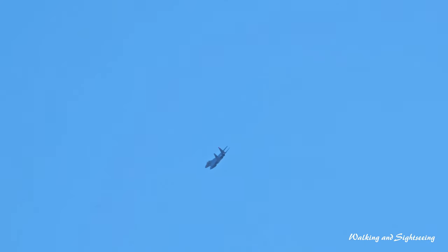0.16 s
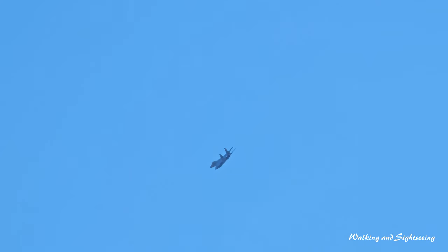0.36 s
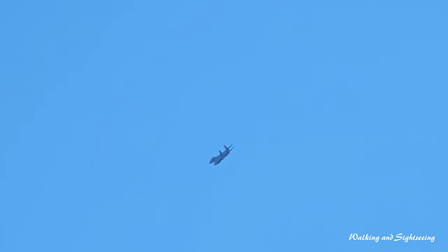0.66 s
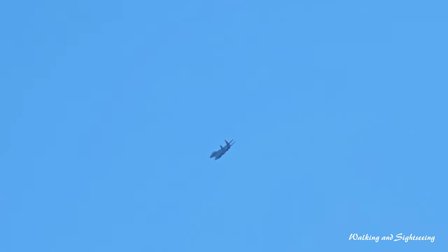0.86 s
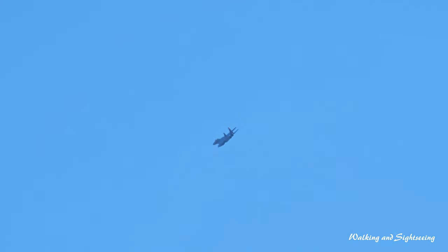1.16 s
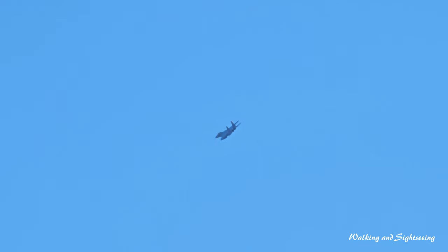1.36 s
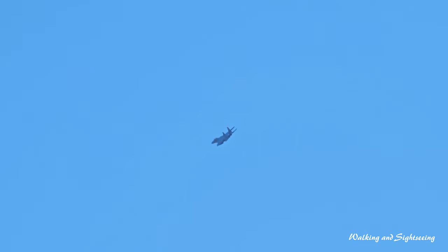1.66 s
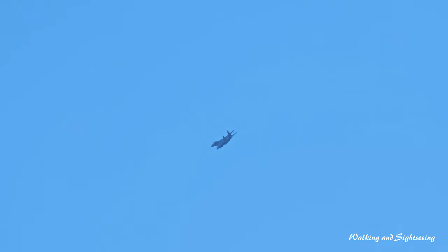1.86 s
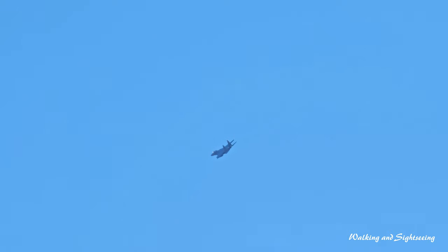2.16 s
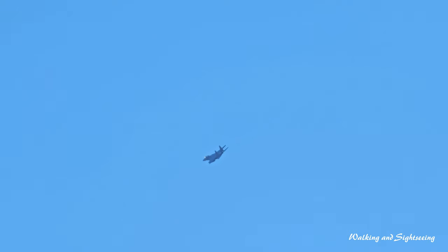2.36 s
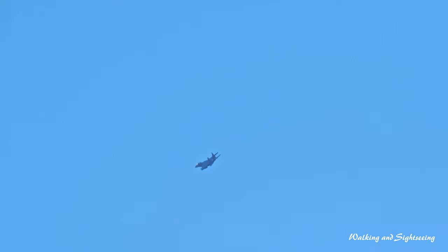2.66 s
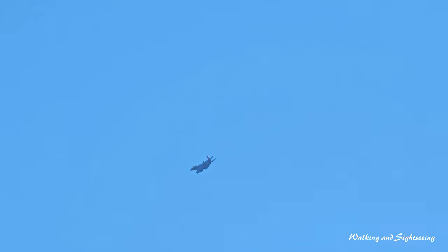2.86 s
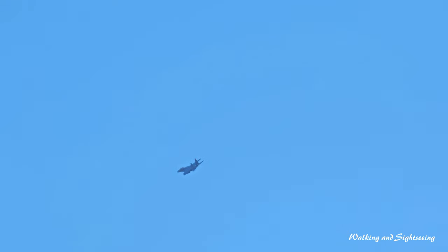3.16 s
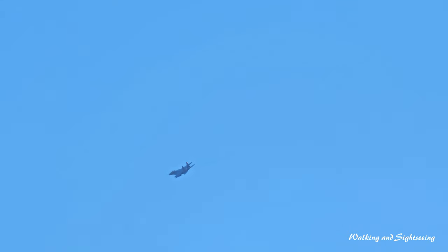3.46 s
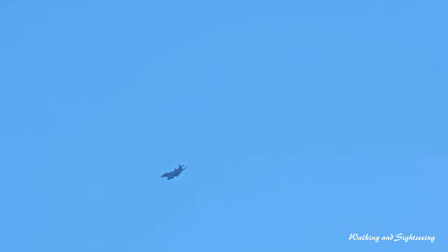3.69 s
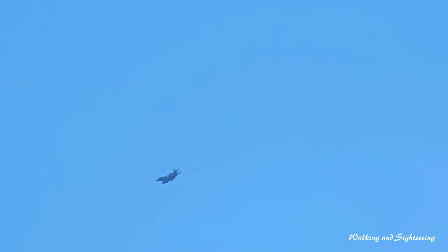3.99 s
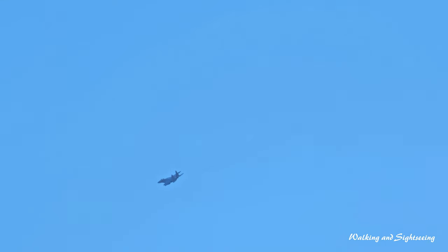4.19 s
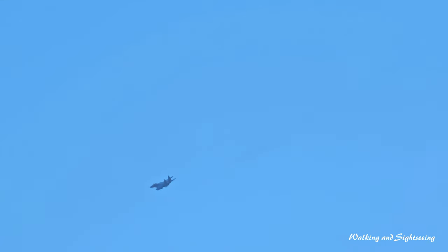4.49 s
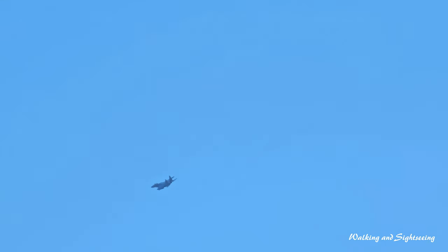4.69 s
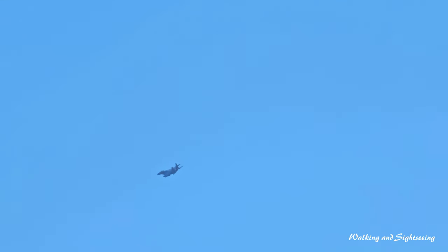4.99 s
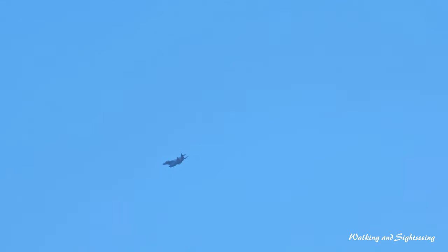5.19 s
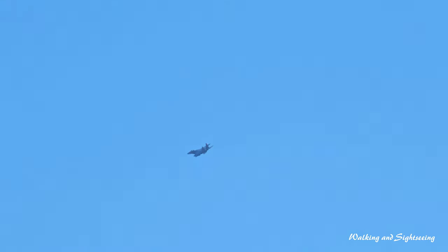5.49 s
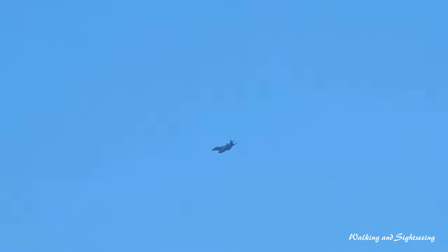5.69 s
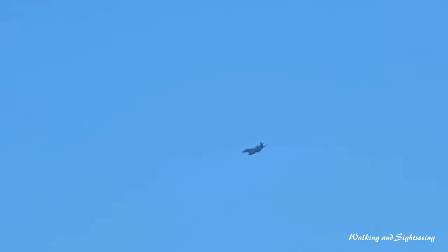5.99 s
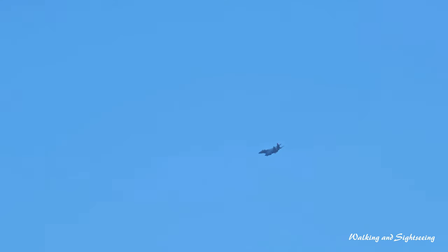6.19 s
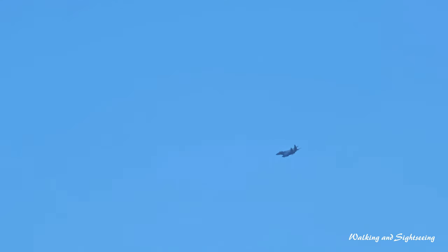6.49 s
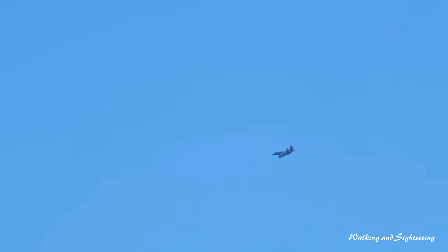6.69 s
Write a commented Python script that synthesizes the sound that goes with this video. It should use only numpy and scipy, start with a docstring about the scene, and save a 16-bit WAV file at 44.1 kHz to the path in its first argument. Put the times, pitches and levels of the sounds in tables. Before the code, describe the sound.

A distant fighter jet turns in open sky, heard outdoors from the ground in wide stereo. From 0 to 2 s there is a dark, mid-low roar over deep rumble, fluttering and gusty, with a thin central fizz fading away and a few soft crackles near 0.8 and 1.3 s. A low thud swells around 1.8 s. From 2 to 4 s the exhaust comes round: the tone drops, the roar turns rougher, with a heavy thump near 3.4 s and scattered crackles, notably around 2.9 and 3.9 s. From 4.5 to 5.5 s it is loudest, with dense volleys of dull and snappy shocks tearing through heavy bass thuds. Crackling continues in looser bursts, surging near 6.1 s, then thins toward 6.85 s while the roar persists, somewhat lighter. Brief lulls break the turbulence; short scattered reflections and a faint steady hiss lie underneath.

```python
"""A distant fighter jet, made from shaped noise and pressure pulses, turns its exhaust towards the listener.
Large eddies rumble, smaller ones roar and rasp, and the finest fizz at first; the biggest pass as low thuds.
As the exhaust comes round, a crackle of small shocks grows; strong shocks come in volleys, dull to snappy.
The air takes off treble, the ground cancels a band, and random echoes scatter the shocks to both sides.
A faint, steady hiss lies underneath."""
import sys
import numpy as np
from scipy import signal
from scipy.fft import rfft, irfft, next_fast_len
from scipy.io import wavfile
from scipy.ndimage import uniform_filter1d, minimum_filter1d, map_coordinates

SR = 44100
rng = np.random.default_rng(int(sys.argv[2]) if len(sys.argv) > 2 else 0)


def unload_audio(sound):
    """Save the sound as a 16-bit wav file, at the path given as the first command line argument."""
    columns = np.transpose(np.atleast_2d(sound))
    # keep every value between -1 and 1, then stretch to whole-number steps
    steps = np.round(np.clip(columns, -1, 1) * 32767)
    wavfile.write(sys.argv[1], SR, steps.astype(np.int16))


N = 301990

# How squarely the exhaust faces the listener: [t/s, facing 0-1]
FACING = [(0, 0.06), (1.3, 0.13), (2.1, 0.35), (4.3, 0.93), (4.7, 0.8), (6.85, 0.4)]
# Base levels of the rumble, the roar, and the treble that gets through the air: [t/s, level/dB]
BASS_LEVEL = [(0.0, -25), (1.62, -27), (1.85, -22.5), (2.25, -28.5), (2.85, -26.5), (3.32, -25.5),
              (3.81, -32), (4.5, -24.5), (4.92, -19), (5.15, -19), (6.85, -22.5)]
ROAR_LEVEL = [(0.0, -23), (0.55, -25), (0.77, -24), (0.95, -23), (1.53, -24.5), (2.1, -20), (2.45, -23),
              (2.7, -24.5), (3.0, -23), (3.35, -19.5), (3.58, -25), (4.0, -19.5), (4.6, -21), (4.75, -20),
              (5.07, -16.5), (5.28, -18.5), (5.55, -19), (5.8, -19.5), (6.281, -18), (6.58, -22.5),
              (6.85, -20)]
TREBLE_LEVEL = [(0.0, -36.5), (0.5, -42.5), (1.22, -36.5), (1.6, -38.5), (1.75, -42), (2.13, -45.5),
                (2.38, -45.5), (3.34, -43), (4.1, -43), (4.5, -42), (4.85, -38.5), (5.02, -40.5),
                (5.23, -39.5), (5.36, -40.5), (5.6, -39), (5.85, -38), (5.95, -39.5), (6.1, -43),
                (6.35, -43.5), (6.85, -41.5)]
# Tone of the large eddies' rumble: [f/Hz, relative level/dB per Hz]
RUMBLE_SPECTRUM = [(12, -29), (25, -14), (42, -4.5), (70, -1.5), (100, -3), (135, -12), (175, -17),
                   (600, -83.5)]
# Tone of the roar side-on, exhaust turned round, and drawing away: [f/Hz, relative level/dB per Hz]
ROAR_SIDE_SPECTRUM = [(60, -28), (125, -6.5), (165, -7), (210, -1.5), (260, -2.5), (310, -3.5), (390, -0.5),
                      (445, -9), (540, -6.5), (680, -13.5), (1000, -22), (1500, -29), (3000, -86)]
ROAR_FACING_SPECTRUM = [(60, -20), (115, 1), (145, 1), (190, 0), (240, -1), (340, -0.5), (420, -5),
                        (520, -9), (620, -12.5), (830, -22), (1000, -25.5), (1500, -42.5), (3000, -71.5)]
ROAR_AWAY_SPECTRUM = [(60, -29.5), (110, -14), (160, 2.5), (250, 2.5), (350, -3.5), (500, -6.5), (610, -14),
                      (740, -19.5), (850, -28.5), (1500, -39), (3000, -71)]
# Tone of the rasp and of the finest eddies' fizz: [f/Hz, relative level/dB per Hz]
RASP_SPECTRUM = [(400, -16.5), (640, -0.5), (860, -5), (1050, -3.5), (1300, -2), (1470, -4), (1560, -5.5),
                 (1750, -12), (2100, -14), (2600, -30), (3500, -38), (6000, -57.5)]
FIZZ_SPECTRUM = [(1200, -10), (1900, 6), (2800, -7), (3700, -14.5), (5000, -41)]
# Tone of the steady hiss: [f/Hz, relative level/dB per Hz]
HISS_SPECTRUM = [(300, -2.5), (2500, 12.5), (3600, 11.5), (4300, 7), (4900, 10.5), (5500, 6.5), (6000, -3),
                 (7300, 4.5), (9000, 1), (13500, 2.5), (15700, 2)]
# Tone of a shock's crack, its dull body and its snap: [f/Hz, relative level/dB per Hz]
CRACK_SPECTRUM = [(30, -27.5), (110, -3), (190, 6), (450, -1.5), (660, 3.5), (830, 3.5), (990, -1),
                  (1330, -6.5), (1520, -16), (2100, -29), (2700, -37.5), (3600, -45), (8000, -83)]
BODY_SPECTRUM = [(30, -19), (120, -8), (240, 4.5), (340, -2.5), (530, 2.5), (700, -0.5), (860, -2.5),
                 (1020, -15.5), (1400, -36), (3000, -73.5)]
SNAP_SPECTRUM = [(300, -30), (1500, -3.5), (2200, 10), (2700, 1.5), (3400, -4), (4200, -15), (6500, -28.5),
                 (10000, -49)]
# The band that the ground reflection cancels: [t/s, f/Hz, depth/dB]
GROUND_NOTCH = [(0, 287, -5.5), (1.2, 326, -4.5), (1.6, 340, -10), (2.4, 355, -6.5), (3.5, 319, -3.5),
                (5.3, 330, -3.5), (6.85, 352, -1.5)]
# How long the reflections take to die by 60 dB: [f/Hz, decay/s]
ECHO_DECAY = [(100, 0.16), (700, 0.12), (4000, 0.038)]
# Brief closings of the stereo image: [middle t/s, half-length/s, side level/dB]
NARROWINGS_LIST = [(0.04, 0.066, -3), (0.205, 0.041, -8.5), (0.475, 0.11, -4.5), (0.995, 0.023, -13),
                   (1.2, 0.17, -2), (1.547, 0.082, -1.5), (1.931, 0.035, -4.5), (2.374, 0.13, -1.5),
                   (2.839, 0.027, -17), (3.02, 0.027, -10), (3.379, 0.12, -18.5), (3.515, 0.065, -7),
                   (4.057, 0.096, -3.5), (4.476, 0.031, -15), (5.116, 0.03, -13.5), (5.33, 0.048, -9.5),
                   (5.486, 0.079, -3.5), (5.653, 0.032, -12), (5.934, 0.022, -11.5), (6.009, 0.016, -14),
                   (6.49, 0.059, -10.5)]
# The largest eddies: [t/s, level/dB, f/Hz, lead of the left side/radians]
BIG_EDDIES = [(0.65, -13, 72.6, -2), (0.83, -15.5, 69.4, 1.5), (1.401, -14, 91, -1), (1.78, -7.5, 116, 1.4),
              (2.027, -11, 76, 2), (2.559, -13, 62, 1.5), (2.645, -9, 225, -3), (2.838, -19, 47, -0.5),
              (2.912, -10, 85, -1.3), (3.367, -3, 78, 2), (3.923, -8.5, 73, 1.3), (4.092, -5.5, 230, -1),
              (4.366, -9, 84, 2.5), (4.424, -8.5, 67, -2.5), (4.569, -9, 84, 0.6), (4.779, -5, 64, 0),
              (4.835, -6, 216, 2), (4.936, 1.5, 217, -1.8), (5, -19, 60.4, 5), (5.158, -9, 59, -4),
              (5.189, -10.5, 49.4, -0.3), (5.286, -2.5, 166, 2.5), (5.289, -2.5, 76, -2),
              (5.305, -6.5, 174, 1), (5.435, -7, 182, 0), (5.44, -6.5, 57, 2), (5.477, -5.5, 163, 1),
              (5.774, -9, 95, -4.5), (5.895, -8.5, 140, 1), (6.054, -10, 71, -2.4), (6.112, -2, 59.2, 2),
              (6.251, -10, 70, 0.2), (6.39, -3.5, 181, 1), (6.427, -4, 50, -1.8), (6.565, -10.5, 71, 1.7),
              (6.647, -5, 55.6, 0.3)]
# Volleys of shocks: [t/s, level of the crack/dB, steepness 0 dull to 1 sharp, spread/s]
SHOCK_VOLLEYS = [(0.818, -23.5, 0.48, .009), (1.075, -31.5, 0.13, 0.019), (1.319, -30, 0.55, .008),
                 (2.022, -32, 0.11, 0.013), (2.121, -30.5, 0.2, 0.008), (2.826, -24, 0.51, 0.0054),
                 (2.895, -27.5, 0.62, .008), (2.939, -27.5, 0.48, 0.006), (3.092, -25, .6, 0.0088),
                 (3.232, -38, 0.32, 0.0082), (3.715, -30, 0.53, .006), (3.859, -23.5, 0.74, .012),
                 (3.905, -24.5, 0.76, .018), (4.212, -29.5, .72, .005), (4.349, -28.5, .4, 0.003),
                 (4.369, -31, .62, .004), (4.423, -35, 0.37, 0.004), (4.554, -22, 0.44, 0.0067),
                 (4.611, -21, 0.42, 0.007), (4.645, -25, 0.44, .005), (4.676, -17, 0.87, .008),
                 (4.699, -15, 0.61, .005), (4.714, -27.5, 0.66, 0.0046), (4.749, -23, 0.67, 0.0034),
                 (4.783, -19.5, 0.46, 0.004), (4.802, -18, .4, 0.0057), (4.825, -21, 0.57, 0.0074),
                 (4.859, -19.5, 0.27, .007), (4.887, -21, 0.38, 0.0073), (4.91, -25, 0.31, 0.0027),
                 (4.933, -28.5, 0.064, 0.0073), (4.958, -13, .72, 0.003), (5.03, -24.5, 0.9, 0.002),
                 (5.036, -23.5, 0.32, .003), (5.048, -17.5, 0.72, 0.0013), (5.066, -22, 0.55, .004),
                 (5.149, -16, 0.19, 0.004), (5.175, -17.5, 0.82, 0.0032), (5.182, -15, 0.5, 0.0016),
                 (5.202, -16, 0.45, 0.0012), (5.219, -21.5, 0.5, 0.0037), (5.236, -25, 0.35, .01),
                 (5.287, -23, 0.11, 0.0059), (5.307, -22.5, 0.36, .004), (5.336, -28.5, .4, .002),
                 (5.377, -24.5, .9, .005), (5.399, -24.5, 0.61, 0.002), (5.435, -28.5, 0.34, .005),
                 (5.473, -12.5, 0.74, .004), (5.491, -26, .85, 0.002), (5.549, -26.5, .5, .004),
                 (5.583, -19.5, 0.83, .003), (5.691, -21.5, .9, .005), (5.761, -22, 0.81, .003),
                 (5.779, -20, 0.66, 0.0063), (5.833, -27.5, 0.44, 0.0056), (5.856, -27, 1, 0.0025),
                 (5.878, -23.5, 0.79, 0.0074), (5.797, -24, .9, .002), (5.984, -18.5, 0.5, 0.0059),
                 (6.008, -19.5, 0.44, 0.003), (6.02, -19, .55, 0.0024), (6.056, -20, 0.95, 0.008),
                 (6.083, -11.5, 0.59, .003), (6.101, -12.5, 0.51, .007), (6.126, -18.5, 0.37, .006),
                 (6.194, -29, 0.24, 0.012), (6.245, -27, .5, .004), (6.322, -27.5, 0.4, 0.0068),
                 (6.423, -26, 0.19, 0.007), (6.644, -22.5, 0.71, 0.015)]
# Thin single snaps: [t/s, level/dB]
LONE_SNAPS = [(0.89, -36)]
# Lulls in the turbulence: [middle t/s, half-length/s, level/dB]
LULL_TIMES = [(1.873, 0.033, -2.5), (2.445, .03, -4.5), (2.778, .02, -4.5), (2.995, 0.044, -1.5),
              (4.004, 0.017, -5), (4.136, 0.022, -2), (4.498, 0.015, -2), (4.623, 0.012, -1.5),
              (4.728, 0.015, -6), (4.975, 0.014, -8), (5.108, 0.0087, -1), (5.368, 0.037, -5),
              (5.409, 0.014, -2.5), (5.524, 0.017, -0.5), (5.653, .035, -5), (5.949, 0.043, -1),
              (6.517, .05, -1), (6.745, 0.045, -3)]

RUMBLE_DB, ROAR_DB, RASP_DB = 3, 2.5, 2  # added to the bass, roar and treble base levels
RUMBLE_FACING_DB, ROAR_FACING_DB, RASP_FACING_DB = 1.5, -0.5, -2.5  # change as the exhaust comes round
SURGE_DB, SURGE_PER_S = 3.0, 20  # size and random points a second of the rumble's heaving
RUMBLE_ALIKE, ROAR_ALIKE, RASP_ALIKE = 0.25, 0.21, 0.04  # left-right correlation; the rasp's rises side-on
LULL_RUMBLE, LULL_RASP = 0.6, 0.3  # share of a lull that each follows
FIZZ_DB, FIZZ_FADE_DB_PER_S = -49.5, 10.5  # starting level and steady fall
CRACKLE_DB, CRACKLE_FACING_DB = -2.5, 13  # over the treble base level, and change as the exhaust comes round
BODY_DB, BODY_STEEP_DB = 12.5, -18  # dull body over the crack, and change from dullest to steepest
SNAP_DB, SNAP_STEEP_DB = -44.5, 22.5  # snap over the crack, and change from dullest to steepest
DRY_STEEP_DB = 6  # how much less reflected sound trails the steepest shocks
TOP_HZ = 15750  # nothing is kept from here up


def amp(db):
    """Turns decibels into gain."""
    return 10 ** (np.asarray(db) / 20)


def unit(x):
    """Scales a sound to rms 1."""
    return x / np.sqrt(np.mean(x ** 2) + 1e-20)


def along(points, hz):
    """Reads (Hz, value) points on a log frequency axis."""
    f, v = np.transpose(points)
    return np.interp(np.log(hz + 1), np.log(f + 1), v)


def curves(rows):
    """Draws one value per sample for each column after the time."""
    s, *cols = np.transpose(rows)
    return [np.interp(np.arange(N) / SR, s, c) for c in cols]


def wobble(rate):
    """A smooth random curve through this many random points a second."""
    return map_coordinates(rng.standard_normal(4096), [np.arange(N) * rate / SR], mode="wrap")


def filtered(x, response):
    """Changes the strength of each frequency by a response curve."""
    m = next_fast_len(N + SR // 2)
    spectrum = rfft(x, m) * response(np.fft.rfftfreq(m, 1 / SR))
    return irfft(spectrum, m)[..., :N]


def pulse(spectrum, size=4096):
    """The most sudden pulse with this spectrum (minimum phase), peak 1."""
    log_gain = np.log(amp(along(spectrum, np.fft.rfftfreq(size, 1 / SR))))
    cepstrum = irfft(log_gain)
    # Folding the second half onto the first puts the energy as early as possible
    cepstrum[1:size // 2] *= 2
    cepstrum[size // 2 + 1:] = 0
    shape = irfft(np.exp(rfft(cepstrum)))
    return shape / np.abs(shape).max()


def patches(x, depth_db, width_hz, life):
    """Paths through gusty air strengthen and weaken short-lived patches of the spectrum."""
    hz, t, z = signal.stft(x, SR, nperseg=2048, noverlap=1536)
    rows, cols = np.meshgrid(hz / width_hz, t / life, indexing="ij")
    field = map_coordinates(rng.standard_normal((512, 256)), [rows, cols], order=1, mode="wrap")
    patchy = z * amp(depth_db * unit(field))
    return signal.istft(patchy, SR, nperseg=2048, noverlap=1536)[1][..., :N]


def rush(spectrum, patchy_db, width_hz=45, life=.09):
    """Two unrelated patchy noises with this spectrum, rms 1 together."""
    noise = np.array([patches(row, patchy_db, width_hz, life) for row in rng.standard_normal((2, N))])
    return unit(filtered(noise, lambda hz: amp(along(spectrum, hz))))


def steadied(x, seconds):
    """Evens out a sound's chance swells longer than this."""
    size = max(int(seconds * SR), 2)
    power = uniform_filter1d(uniform_filter1d(x ** 2, size), size // 2)
    return x / np.sqrt(np.abs(power) + 1e-12)


def stereo(pair, alike):
    """Uses two unrelated sounds as middle and side, giving this left-right correlation."""
    turn = np.arccos(np.clip(alike, -1, 1)) / 2
    mid, side = pair[0] * np.cos(turn), pair[1] * np.sin(turn)
    return np.array([mid + side, mid - side])


def pan(db):
    """Left and right gains for a level difference; above 0 leans left."""
    return amp([[db / 2], [-db / 2]])


def add(track, s, sound):
    """Mixes a sound into the track at a time in seconds."""
    room = track[:, max(round(s * SR), 0):][:, :sound.shape[-1]]
    room += sound[..., :room.shape[1]]


def scatter(wet_db):
    """Ground and walls add a fresh random tail of reflections to the direct path on each side."""
    hz, t, z = signal.stft(rng.standard_normal((2, SR // 6)), SR, nperseg=256)
    decay = amp(-60 * t / along(ECHO_DECAY, hz)[:, None])
    tail = signal.istft(z * decay, SR, nperseg=256)[1]
    paths = amp(wet_db) * tail / np.linalg.norm(tail[0])
    paths[:, 0] += 1  # the direct sound
    return paths


def ground_notch(x, octaves):
    """The ground reflection weakens one band, whose pitch and depth shift as the jet moves."""
    hz, t, z = signal.stft(x, SR, nperseg=2048)
    s, notch_hz, depth_db = np.transpose(GROUND_NOTCH)
    away = np.log2((hz[:, None] + 1) / np.interp(t, s, notch_hz)) / octaves
    dip_db = np.interp(t, s, depth_db) * np.exp(-away ** 2)
    return signal.istft(z * amp(dip_db), SR, nperseg=2048)[1][..., :N]


def mixing_noise(bass_db, level_db, treble_db, facing):
    """Eddies of three sizes rumble, roar and rasp; the roar and rasp flutter more as the exhaust faces us."""
    flutter = (0.81 + 1.0 * facing) * (wobble(80) + 0.67 * wobble(22))
    surge_db = SURGE_DB * wobble(SURGE_PER_S)
    rumble_db = bass_db + RUMBLE_DB + RUMBLE_FACING_DB * facing + surge_db
    rumble = amp(rumble_db) * steadied(rush(RUMBLE_SPECTRUM, patchy_db=1.5), seconds=0.05)

    # The roar's tone drops as the exhaust turns,
    # then thins in the lows and moves up a little as the jet draws away
    turned = np.clip(facing / 0.35, 0, 1)
    side_on = np.sqrt(1 - turned) * rush(ROAR_SIDE_SPECTRUM, patchy_db=4.0)
    eddies = side_on + np.sqrt(turned) * rush(ROAR_FACING_SPECTRUM, patchy_db=3.5)
    leaving = np.interp(np.arange(N) / SR, [5.0, 6.4], [0, 1])
    eddies = np.sqrt(1 - leaving) * eddies + np.sqrt(leaving) * rush(ROAR_AWAY_SPECTRUM, patchy_db=3.5)
    eddies = ground_notch(eddies, octaves=0.26)
    roar_db = level_db + ROAR_DB + ROAR_FACING_DB * facing + 0.97 * flutter
    roar = amp(roar_db) * steadied(eddies, seconds=0.088)

    rasp_db = treble_db + RASP_DB + RASP_FACING_DB * facing + 0.35 * flutter
    rasp = amp(rasp_db) * rush(RASP_SPECTRUM, patchy_db=2.5, width_hz=70)
    direct = 0.17 * (1 - turned)  # side-on, few reflections reach us, so both sides are more alike

    mix = stereo(rumble, RUMBLE_ALIKE) * pan(0.96)
    mix += stereo(roar, ROAR_ALIKE) * pan(0.59)
    return mix + stereo(rasp, RASP_ALIKE + direct) * pan(-.4)


def fizz():
    """The finest eddies make a thin, central noise that fades steadily as the jet turns away."""
    level_db = FIZZ_DB - FIZZ_FADE_DB_PER_S * np.arange(N) / SR
    return amp(level_db) * stereo(rush(FIZZ_SPECTRUM, patchy_db=-1.0, width_hz=120), alike=1.0)


def crackle(treble_db, facing, rate, spread_db, clump_db):
    """Pressure waves steepen into small shocks of very uneven size, stronger and weaker in clumps."""
    chance = rng.random(N)
    size = np.minimum(rng.standard_normal(N), 2)
    fronts = (chance < rate / SR) * amp(spread_db * size + clump_db * wobble(45))
    paths = signal.fftconvolve(scatter(wet_db=2.0), pulse(CRACK_SPECTRUM)[None], axes=1)
    heard = signal.fftconvolve((fronts - fronts.mean())[None], paths, axes=1)[:, :N]
    level_db = treble_db + CRACKLE_DB + CRACKLE_FACING_DB * facing
    return amp(level_db) * steadied(heard, seconds=0.05)


def hiss():
    """A faint, nearly steady noise whose top treble leans left."""
    noise = amp(-57.0 + .35 * wobble(22)) * rush(HISS_SPECTRUM, patchy_db=2.0, width_hz=250, life=.05)
    lean = [(4000, -0.5), (9000, -1.5), (12000, 0.0), (15000, 7.5)]  # f/Hz, left over right/dB
    return filtered(noise, lambda hz: amp(np.outer([1, -1], along(lean, hz)) / 2))


def narrowed(x, centre_gain):
    """The stereo image closes in briefly: the side drops and the centre firms up a little."""
    t = np.arange(N) / SR
    width_db = sum(db * np.exp(-((t - s) / half) ** 4) for s, half, db in NARROWINGS_LIST)
    width = amp(width_db)
    mid = (x[0] + x[1]) / 2 * (1 + centre_gain * (1 - width))
    side = (x[0] - x[1]) / 2 * width
    return np.array([mid + side, mid - side])


def thuds(cycles):
    """A big eddy passes as a few slow swings of pressure, out of step between the sides."""
    out, t = np.zeros((2, N)), np.arange(-SR // 16, SR // 16) / SR
    starts = rng.random(len(BIG_EDDIES))
    for (s, db, hz, lead), start in zip(BIG_EDDIES, starts):
        swell = np.exp(-(t * hz / cycles) ** 2)
        swing = np.sin(2 * np.pi * (hz * t + start) + lead / 2 * np.array([[1], [-1]]))
        add(out, s + t[0], amp(db) * swell * swing)
    return out


def volleys(trail_db, wet_db, reach, count=9):
    """A shock amid a train of others; steeper ones are drier, with less dull body and more snap."""
    out = np.zeros((2, N))
    shapes = [pulse(BODY_SPECTRUM), pulse(CRACK_SPECTRUM), pulse(SNAP_SPECTRUM)]
    middle = SR // 20  # the train allows 50 ms either side of the main shock
    for s, db, steep, spread in SHOCK_VOLLEYS:
        place = reach * (2 * (np.arange(count) + rng.random(count)) / count - 1)
        offsets = np.clip(spread * SR * place, -middle, middle).astype(int)
        sizes = unit(np.tanh(2 * stereo(rng.standard_normal((2, count)), alike=0.2)))
        train = np.zeros((2, 2 * middle + 1))
        train[:, middle + offsets] = amp(trail_db) * np.exp(-place ** 2 / 2) * sizes
        train[:, middle] = pan(3 * rng.standard_normal())[:, 0]  # the main shock, a little off centre
        heard = signal.fftconvolve(train, scatter(wet_db - DRY_STEEP_DB * steep), axes=1)
        body_db = db + BODY_DB + BODY_STEEP_DB * steep
        snap_db = db + SNAP_DB + SNAP_STEEP_DB * steep
        for shape, level_db in zip(shapes, (body_db, db, snap_db)):
            shot = signal.fftconvolve(heard, shape[None], axes=1)
            # The level is that of the loudest 5 ms
            loudest = np.sqrt(uniform_filter1d(np.mean(shot ** 2, axis=0), size=SR // 200).max())
            add(out, s - middle / SR - .001, amp(level_db) * shot / loudest)
    return out


def ticks():
    """A lone shock that is all snap and no body, with a few reflections."""
    out = np.zeros((2, N))
    for s, db in LONE_SNAPS:
        snap = signal.fftconvolve(scatter(wet_db=-4), pulse(SNAP_SPECTRUM)[None], axes=1)
        add(out, s, amp(db) * snap)
    return out


def lulls():
    """The turbulence slackens for a moment: dips in dB."""
    t = np.arange(N) / SR
    return sum(db * np.exp(-((t - s) / half) ** 4) for s, half, db in LULL_TIMES)


def scene():
    """The jet over a faint hiss."""
    level_tables = (BASS_LEVEL, ROAR_LEVEL, TREBLE_LEVEL, FACING)
    (bass_db,), (level_db,), (treble_db,), (facing,) = map(curves, level_tables)
    lull_db = lulls()
    rumble_db = bass_db + LULL_RUMBLE * lull_db
    rasp_db = treble_db + LULL_RASP * lull_db
    jet = mixing_noise(rumble_db, level_db + lull_db, rasp_db, facing)
    jet += fizz()
    jet += crackle(treble_db + lull_db, facing, rate=400, spread_db=11.0, clump_db=4.0)  # rate per second
    jet += thuds(cycles=1.23)
    jet += volleys(trail_db=-1.5, wet_db=-2.5, reach=1.7)
    jet += ticks()
    return narrowed(jet, centre_gain=0.15) + hiss()


def record(dry):
    """A limiter holds peaks near full scale, the ends fade over 5 ms, and the top treble is cut off."""
    needed = 1 / np.maximum(np.abs(dry).max(axis=0), 1)
    held = minimum_filter1d(needed, size=801)
    gain = uniform_filter1d(uniform_filter1d(held, size=401), size=401)
    fade = signal.windows.tukey(N, 2 * .005 * SR / N)
    return filtered(dry * gain * fade, lambda hz: hz < TOP_HZ)


dry = scene()
out = record(dry)
unload_audio(out)
```